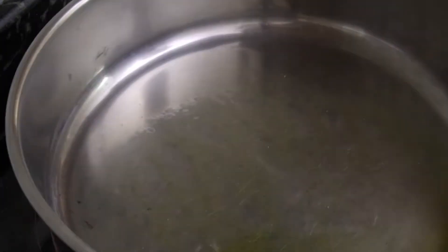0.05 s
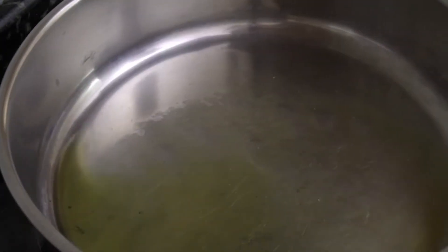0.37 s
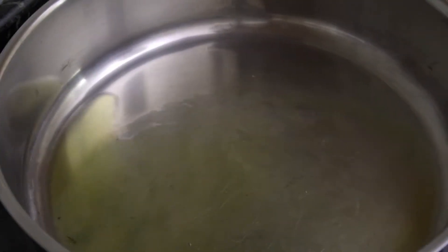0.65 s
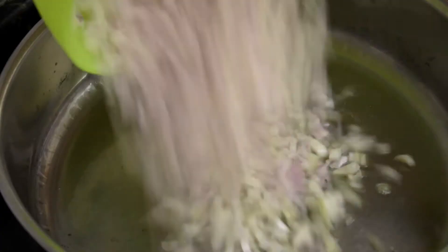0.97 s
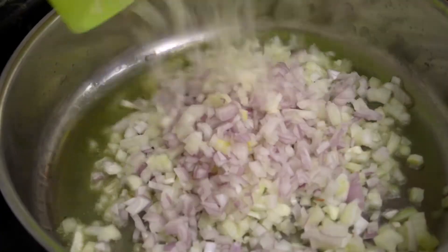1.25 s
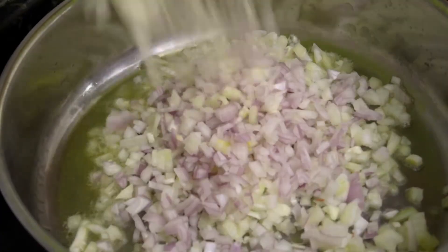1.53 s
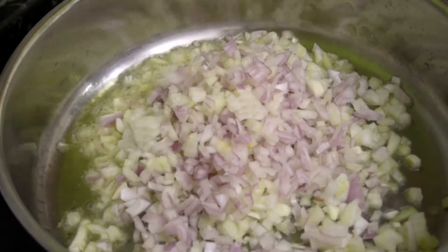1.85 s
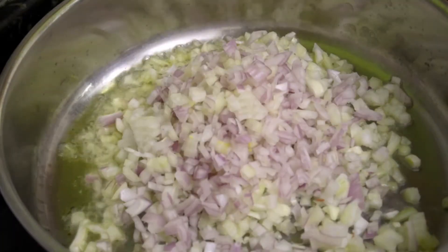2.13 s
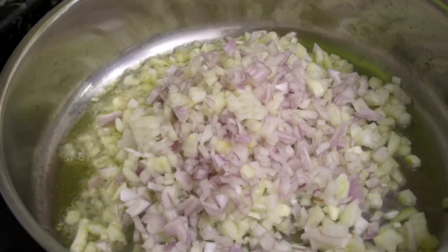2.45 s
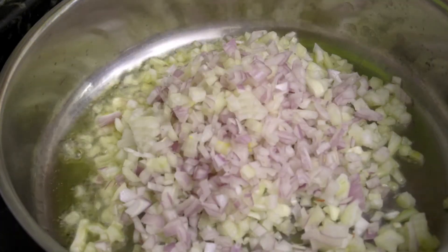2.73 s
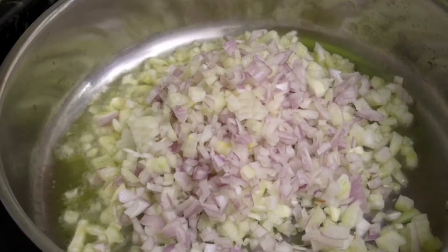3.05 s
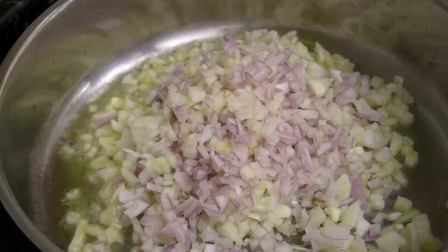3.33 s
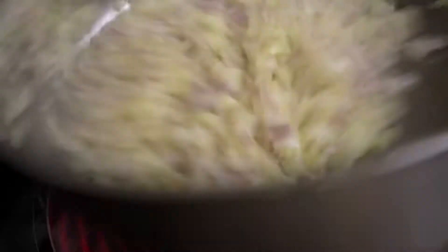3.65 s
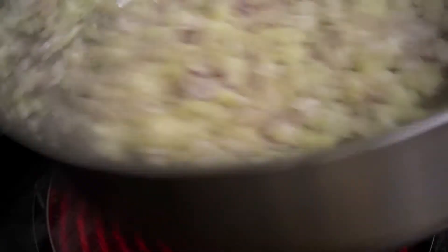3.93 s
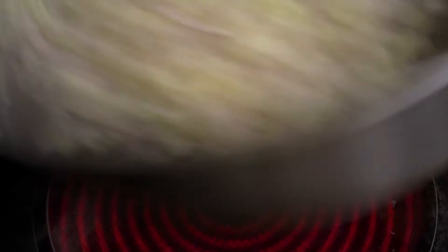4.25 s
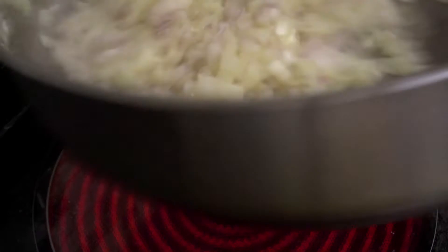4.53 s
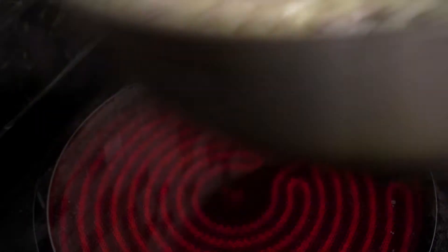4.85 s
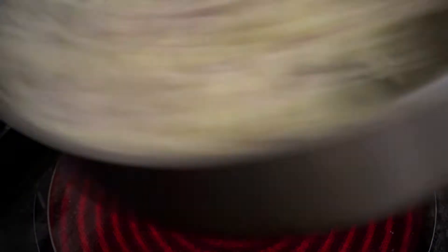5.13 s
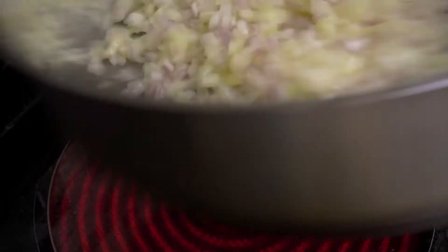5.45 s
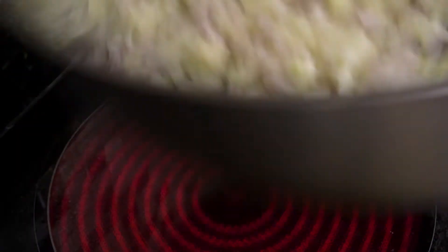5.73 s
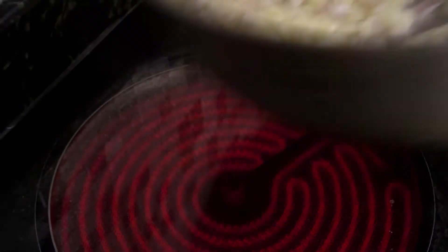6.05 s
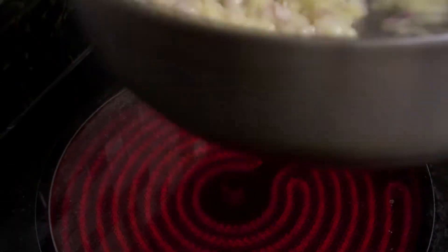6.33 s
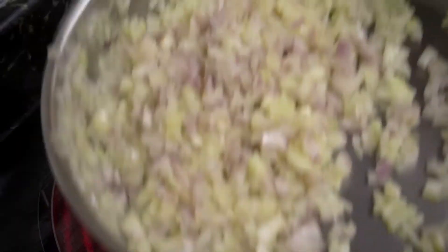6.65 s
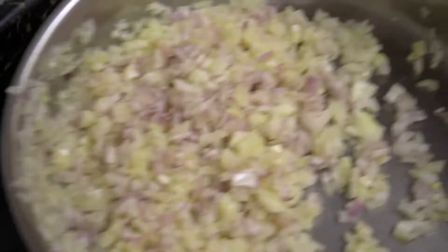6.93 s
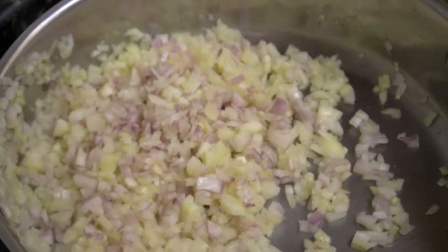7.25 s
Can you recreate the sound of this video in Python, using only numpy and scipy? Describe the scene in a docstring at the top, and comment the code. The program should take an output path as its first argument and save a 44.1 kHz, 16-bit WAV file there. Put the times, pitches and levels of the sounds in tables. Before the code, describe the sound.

Onions drop into a steel pan and fry with sharp spits, sizzling harder through repeated shakes before two short clunks of the pan.

```python
"""A small kitchen hums, and a bowl of diced onion rustles faintly on its way to a steel pan.
Near 0.8 s the onion patters into hot oil; its water turns to steam, so the heap sizzles and spits.
From 3.6 s the pan is lifted and tossed: wet pieces keep meeting hot metal and the sizzle surges.
Around 7 s the pan knocks down on the glass hob and rings briefly.
All is heard in mono from just above the pan."""
import sys
import numpy as np
from scipy import signal
from scipy.fft import rfft, irfft, next_fast_len
from scipy.io import wavfile
from scipy.ndimage import map_coordinates

SR = 44100
rng = np.random.default_rng(int(sys.argv[2]) if len(sys.argv) > 2 else 0)


def to_wav(s):
    """Save 16-bit WAV."""
    ch = np.atleast_2d(s).T  # columns
    pcm = np.round(np.clip(ch, -1, 1) * 32767)  # PCM
    wavfile.write(sys.argv[1], SR, pcm.astype(np.int16))


N = 330309

TOP_HZ = 15850  # the highest pitch in the sound
LIFT_S = 3.609  # when the pan leaves the hob


def amp(db):
    """Turn decibels into a multiplier: 0 dB is 1, -20 dB is a tenth."""
    return 10 ** (np.asarray(db) / 20)


def unit(x):
    """Scale a sound so that its average level (rms) is 1."""
    return x / np.sqrt(np.mean(x ** 2) + 1e-20)


def seconds(size):
    """The time of each sample."""
    return np.arange(size) / SR


def since(s):
    """Seconds gone by after time s, zero before it."""
    return np.maximum(seconds(N) - s, 0)


def onset(s, rise):
    """A ramp from 0 to 1 that starts at time s."""
    return np.clip((seconds(N) - s) / rise, 0, 1)


def swell(s, rise, fall):
    """A smooth hill that reaches 1 at time s."""
    t = seconds(N) - s
    return np.exp(-(t / np.where(t < 0, rise, fall)) ** 2)


def wobble(rate):
    """A smooth curve through `rate` random values a second."""
    return map_coordinates(rng.standard_normal(int(N * rate / SR) + 4), [seconds(N) * rate])


def along(points, hz):
    """Read between (pitch, value) points, with octaves evenly spaced."""
    pitches, values = np.transpose(points)
    return np.interp(np.log(hz + 1), np.log(pitches + 1), values)


def hump(hz, centre_hz, slope_db):
    """A broad peak in dB that falls away by slope_db an octave."""
    return -slope_db * (np.hypot(np.log2((hz + 1) / centre_hz), .5) - .5)


def add(track, s, sound):
    """Mix a sound into the track at time s."""
    room_left = track[max(round(s * SR), 0):][:len(sound)]
    room_left += sound[:len(room_left)]


def coloured(x, gain_db):
    """Make each pitch in x louder or softer by gain_db(hz)."""
    size = 2 * next_fast_len(len(x) // 2 + 4096)
    cepstrum = irfft(np.log(amp(gain_db(np.fft.rfftfreq(size, 1 / SR))) + 1e-6))
    # fold the filter so that it rings after a click, never before
    cepstrum[1:size // 2] *= 2
    cepstrum[size // 2 + 1:] = 0
    return irfft(rfft(x, size) * np.exp(rfft(cepstrum)))[:len(x)]


def pan_walls(hz):
    """The pan's walls boost some pitches and cancel others; gives the gain in dB."""
    # the bands they change: (pitch [Hz], width [Hz], gain [dB])
    bands = [(672, 24, 8.5), (1226, 59, 3.5), (1490, 91, -1), (1710, 140, 1.5), (2700, 38, 3),
             (3580, 320, 0), (4800, 290, 0.6), (5720, 340, 2.5), (6450, 750, -5)]
    return sum(db * np.exp(-((hz - centre) / width) ** 2) for centre, width, db in bands)


def background():
    """The kitchen rumbles, and the mains and a fan hum a little unsteadily."""
    # tone of the rumble: (pitch [Hz], gain [dB])
    colour = [(20, -15), (48, -2), (66, -5), (105, -2.5), (150, -10.5), (220, -15), (340, -15),
              (450, -21.5), (700, -23), (1200, -36.5), (2500, -36), (6000, -39), (10000, -46), (13000, -77)]
    # mains and fan tones: (pitch [Hz], average level [dB])
    tones = [(48.4, -64.5), (102.3, -60), (150.7, -71.5), (355.3, -83), (683.7, -97.5)]
    rumble = unit(coloured(rng.standard_normal(N), lambda hz: along(colour, hz)))
    hum = sum(amp(db) * np.sqrt(2) * np.sin(2 * np.pi * hz * seconds(N) + 0.45 * wobble(2.68))
              for hz, db in tones)
    return amp(-60) * rumble + hum


def kitchen_echo(x):
    """The room's walls give a short echo in which low notes last longest."""
    # length of the echo: (pitch [Hz], time to fade by 60 dB [s])
    fades = [(100, 0.48), (1000, .3), (5000, 0.096), (15000, 0.12)]
    hz, t, noise = signal.stft(rng.standard_normal(SR // 2), SR, nperseg=256)
    tail = signal.istft(noise * amp(-60 * t / along(fades, hz)[:, None]), SR, nperseg=256)[1]
    delayed = np.pad(x, (SR // 150, 0))
    return signal.fftconvolve(delayed, tail / np.linalg.norm(tail))[:N]


def rustle():
    """A faint, smooth rustle as the onions are fetched and brought over the pan."""
    # tone of the rustle: (pitch [Hz], gain [dB])
    colour = [(400, -8), (800, -11), (950, -2), (1100, -2.5), (1400, -8), (1900, -13), (2600, -12),
              (3500, -16), (5500, -11.5), (8500, -18.5), (11500, -28), (13500, -44)]
    # moves of the onion bowl: (loudest moment [s], level [dB], rise [s], fall [s])
    swishes = [(0.33, -68, 0.085, 0.056), (0.67, -64, .17, 0.097)]
    still_db = -79  # faint hiss when nothing moves
    hiss = coloured(rng.standard_normal(N), lambda hz: along(colour, hz) + pan_walls(hz))
    motion = amp(still_db) + sum(amp(db) * swell(s, rise, fall) for s, db, rise, fall in swishes)
    return motion * amp(0.88 * wobble(40.3)) * unit(hiss)


def bumps():
    """Heavy, soft pushes that swing once or twice."""
    # dull bumps: (time [s], level [dB], pitch [Hz], rise [s])
    pushes = [(0.016, -31, 46, 0.008), (1.042, -41, 86, 0.0046), (1.15, -44, 45, 0.0097),
              (3.555, -43.5, 40, 0.0076), (7.2485, -17.5, 100, 0.0042)]
    track, t = np.zeros(N), seconds(SR // 3)
    for s, db, hz, rise in pushes:
        loudness = amp(db) * t / rise * np.exp(1 - t / rise)
        add(track, s, -loudness * np.sin(2 * np.pi * hz * t))
    return track


def knocks():
    """The pan lands on its edge, then settles flat; the food damps its ring and dulls the clack."""
    # the steel's notes: (pitch [Hz], edge hit [dB], flat hit [dB], time to fade by 60 dB [s])
    notes = [(104.6, -18, -16, 0.33), (188, 2.5, -25, 0.19), (240, -12, -17, 0.1), (293, 5.5, -14, 0.043),
             (349, -24.5, 0, 0.13), (416, -19, -12, 0.057), (515, -14, -10, 0.062), (592, -23, -6, 0.095),
             (656, 5, -14, 0.047), (984, 3.5, -11.5, 0.044), (1170, -4, -3, 0.037), (1390, -13, -15, .04),
             (1660, -26, -16, .05), (2000, -19, -18, 0.027)]
    # pan touching hob: (time [s], strength [dB], flatness [0 edge to 1 flat])
    contacts = [(3.547, -41.5, 0.46), (6.9182, -22, 0.31), (6.9245, -43, 0.5), (7.244, -22, 0.95),
                (7.2535, -20.5, 0.6), (7.260, -26.5, 0.95)]
    track, t = np.zeros(N), seconds(SR // 2)
    dulling = signal.butter(2, 2000, fs=SR)  # softens everything above 2000 Hz
    for s, db, flatness in contacts:
        ring = np.zeros(len(t))
        for hz, edge_db, flat_db, fade_s in notes:
            note_db = edge_db + flatness * (flat_db - edge_db) + rng.normal(0, 1.0)
            ring += amp(note_db - 60 * t / fade_s) * np.sin(2 * np.pi * hz * t)
        clack = signal.lfilter(*dulling, rng.standard_normal(len(t)) * amp(-60 * t / 0.042))
        add(track, s, amp(db) * (ring + amp(7.5) * clack) * (1 - np.exp(-t / 0.00082)))
    return track


def pats_and_spit():
    """Puffs of noise: soft pats and brushes, mostly onion landing, and one loud, sharp spit of oil."""
    # the spit is the row at 1.2552 s; the rest are pats and brushes:
    # (time [s], peak [dB], pitch [Hz], time to fade by 60 dB [s], slope [dB/octave])
    puffs = [(0.208, -53.5, 4600, 0.055, 20), (0.212, -57, 840, .15, 42), (0.257, -53.5, 1030, 0.18, 44),
             (0.772, -45, 1400, 0.092, 14), (0.782, -37.5, 3620, 0.043, 15), (0.811, -45, 2400, 0.14, 18),
             (0.868, -42, 5600, 0.083, 19), (0.9993, -33, 520, 0.019, 9), (1.2552, -13, 5560, 0.032, 7),
             (1.463, -29, 1430, 0.025, 26), (7.222, -41, 350, 0.21, 17)]
    track, t = np.zeros(N), seconds(8192)
    for s, db, pitch_hz, fade_s, slope_db in puffs:
        noise = rng.standard_normal(len(t)) * amp(-60 * t / fade_s) * (1 - np.exp(-t / 0.00071))
        puff = coloured(noise, lambda hz: hump(hz, pitch_hz, slope_db) + pan_walls(hz))
        add(track, s, amp(db) * puff / np.abs(puff).max())
    return track


def pops(count, spread_db):
    """Random clicks, as of tiny steam pockets bursting: most weak, a few strong."""
    when, luck, side = rng.random((count, 3)).T
    strength = amp(-spread_db * np.log(luck + .002)) * np.sign(side - .5)
    return unit(np.bincount((when * N).astype(int), strength, N))


def pour():
    """Hundreds of soft cubes patter into the oil and onto each other, evenly, then thinning out."""
    # tone of the patter: (pitch [Hz], gain [dB])
    colour = [(120, -25), (210, -6), (290, 6), (370, 2), (450, -3), (740, 0), (900, 9), (1020, -8),
              (1240, 6), (1600, -8), (2700, -7), (5000, -33), (9000, -18)]
    start_s, steady_s, thinning_db_per_s = 0.77, 0.58, 21
    patter = coloured(pops(count=7000, spread_db=4.0), lambda hz: along(colour, hz))
    flow = onset(start_s, rise=0.032) * amp(-thinning_db_per_s * since(start_s + steady_s))
    return amp(-56.5) * flow * unit(patter)


def spits():
    """A water drop bursts in the oil with one sharp snap, which scatters between the pan's walls."""
    # bursting drops: (time [s], strength [dB], pitch [Hz], scatter compared with the snap [dB])
    drops = [(0.999, -15, 2100, -13), (1.3534, -12.5, 4830, -15), (1.3808, -10, 9080, -19),
             (1.505, -16.5, 4900, -18), (1.5942, -12.5, 7400, -12), (1.8764, -14.5, 5050, -16.5),
             (1.93, -10, 5570, -22), (2.017, -17.5, 4670, -17), (2.066, -15, 5760, -15),
             (2.136, -13, 9050, -15), (2.379, -11.5, 5790, -16), (2.594, -24.5, 2400, -3),
             (2.7286, -13, 6200, -16.5), (2.772, -7, 8200, -17), (2.9374, -19, 3650, -14),
             (3.1016, -16, 10100, -12), (3.1767, -20.5, 5200, -12), (3.249, -10.5, 8400, -18),
             (3.531, -18, 5010, -14), (3.5534, -17, 4570, -14), (3.563, -17, 5370, -13),
             (6.7932, -11, 5730, -12.5)]
    # tone of every snap: (pitch [Hz], gain [dB])
    colour = [(400, -19), (1200, 2.5), (10000, 1), (15500, -7), (17000, -43)]
    track, t = np.zeros(N), seconds(1024)
    for s, db, pitch_hz, scatter_db in drops:
        burst = amp(scatter_db - 60 * t / 0.024) * rng.standard_normal(len(t))
        burst[0] = 1  # the snap itself
        snap = coloured(burst, lambda hz: hump(hz, pitch_hz, 7.5) + pan_walls(hz) + along(colour, hz))
        add(track, s + .0009, amp(db - 5) * snap / np.abs(snap).max())
    return track


def bubbles(count, life_s, size=192):
    """Larger bubbles swell and ring for a moment, each at its own pitch."""
    when, pitch, luck = rng.random((count, 3)).T[:, :, None]
    t = seconds(size)
    strength = -np.log(luck + .01)
    rings = strength * t * np.exp(-t / life_s) * np.sin(2 * np.pi * pitch * TOP_HZ * t)
    positions = (when * (N - size)).astype(int) + np.arange(size)
    return unit(np.bincount(positions.ravel(), rings.ravel(), N))


def below(x, hz):
    """Keep the part of a sound that is lower than hz."""
    return signal.sosfiltfilt(signal.butter(4, hz, fs=SR, output="sos"), x)


def frying(sizzle_db, bubbling_db, colour, crackle, steam_db, flutter_db, brighten):
    """Crackle and steam hiss in the pan: brighter when fiercer, with wet bubbling lower down."""
    steam = amp(steam_db) * rng.standard_normal(N)
    sound = coloured(crackle + steam, lambda hz: along(colour, hz) + pan_walls(hz))
    wet = below(sound, hz=2500)
    treble = sound - below(sound, hz=6500)
    fierceness_db = np.clip(sizzle_db - np.median(sizzle_db), -6, 6)
    sizzle = unit(sound - wet + (amp(brighten * fierceness_db) - 1) * treble)
    flutter = amp(flutter_db * wobble(45))
    bubbling = amp(bubbling_db + 0.39 * wobble(14)) * unit(wet)
    return flutter * (amp(sizzle_db) * sizzle + bubbling)


def heap():
    """Water flashes off the fresh onions; then the heap settles to a simmer as the oil cools."""
    # tone of the resting heap: (pitch [Hz], gain [dB])
    colour = [(150, -30), (320, -23.5), (450, -24), (720, -19.5), (860, -22), (1020, -16.5), (1250, -9.5),
              (2300, -8.5), (3500, -3), (5000, 1), (8200, 0), (10000, -1.5), (12500, -7.5), (16000, -11)]
    start_s, simmer_db, wet_db, cooling_db_per_s = 0.87, -35, -51, 1.4
    flare_db, flare_hold_s, flare_fade_s = 4.5, 0.33, 0.25
    crackle = pops(count=20000, spread_db=4.0) + amp(-6.5) * bubbles(count=9000, life_s=0.00066)
    resting_s = np.minimum(since(start_s), LIFT_S - start_s)
    flare = np.exp(-since(start_s + flare_hold_s) / flare_fade_s)
    boil_db = flare_db * flare - cooling_db_per_s * resting_s
    floor_covered = onset(start_s, rise=0.2)
    return floor_covered * frying(simmer_db + boil_db, wet_db + 0.5 * boil_db, colour, crackle,
                                  steam_db=2.0, flutter_db=0.6, brighten=0.13)


def toss():
    """A dense rush that surges with each shake, dips with each flip and calms once the hand slows."""
    # tone of the tossed onions: (pitch [Hz], gain [dB])
    colour = [(150, -38), (290, -18.5), (400, -33.5), (500, -18), (780, -14.5), (1200, -10.5), (2300, -8),
              (3500, -1.5), (4800, 1), (8000, -1), (10000, -2.5), (12500, -9), (16000, -13)]
    # shakes slide wet pieces onto hot metal: (loudest moment [s], surge [dB], half-length [s])
    shakes = [(3.71, 3, 0.059), (3.87, 2, .04), (4.0, 3.5, 0.053), (4.14, 3, 0.033), (4.307, 5, 0.062),
              (4.586, 2.5, 0.13), (4.815, 3, 0.099), (5.186, 3.5, 0.054), (5.533, 2, 0.1),
              (5.748, 3.6, 0.062), (5.87, 2, 0.03), (6.015, 2, 0.026), (6.287, 1, 0.032)]
    # flips throw the onions clear of the metal: (time at the top [s], dip [dB])
    flips = [(4.41, 4.5), (5.31, 7.5)]
    tossing_s, rush_db, wet_db, calming_db_per_s = 2.67, -30.5, -42, 3
    crackle = pops(count=90000, spread_db=2.0) + amp(-7.5) * bubbles(count=14000, life_s=0.00072)
    surges_db = sum(db * swell(s, half_length, half_length) for s, db, half_length in shakes)
    airborne_db = sum(db * swell(s, rise=0.039, fall=0.081) for s, db in flips)
    boil_db = surges_db - airborne_db - calming_db_per_s * since(LIFT_S + tossing_s)
    return frying(rush_db + boil_db, wet_db + 0.81 * boil_db, colour, crackle,
                  steam_db=3, flutter_db=0.5, brighten=0.093)


def onions():
    """The heap breaks loose at once when the pan is lifted."""
    lifted = onset(LIFT_S, rise=0.004)
    return heap() * (1 - lifted) + toss() * lifted


def scene():
    """Mix everything, the same in both channels; only the light and heavy hits get an echo."""
    light = spits() + pats_and_spit()
    heavy = knocks() + bumps()
    direct = rustle() + pour() + onions() + light + heavy
    mono = direct + kitchen_echo(amp(-11.5) * light + amp(-13) * heavy) + background()
    return np.array([mono, mono])


def record(dry):
    """Cut away every pitch above TOP_HZ."""
    size = next_fast_len(N + SR // 2)
    kept = np.fft.rfftfreq(size, 1 / SR) < TOP_HZ
    return irfft(rfft(dry, size) * kept, size)[:, :N]


dry = scene()
out = record(dry)
to_wav(out)
```